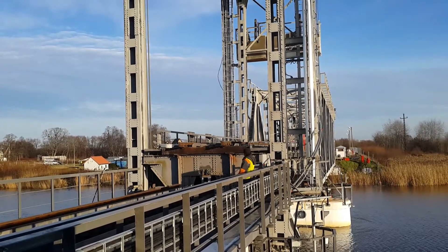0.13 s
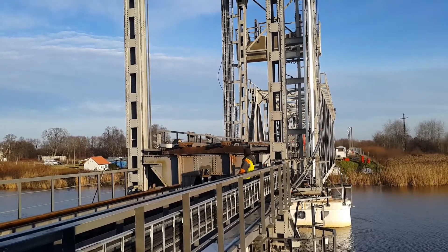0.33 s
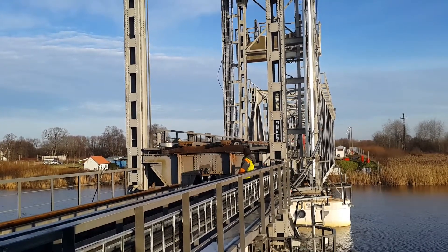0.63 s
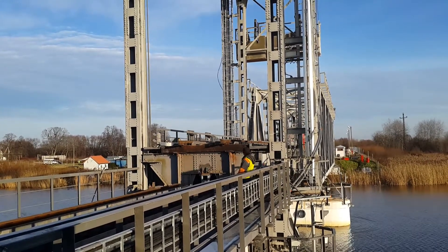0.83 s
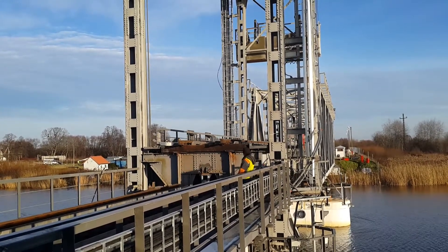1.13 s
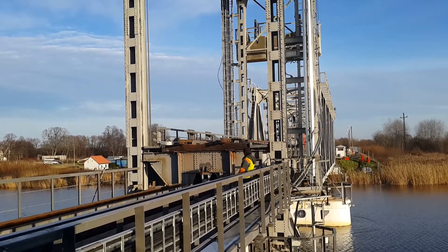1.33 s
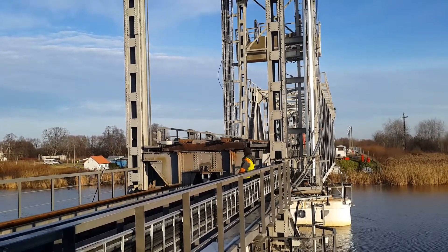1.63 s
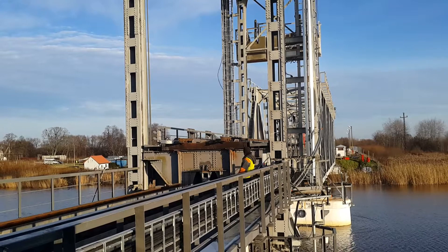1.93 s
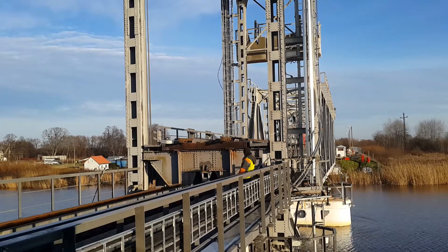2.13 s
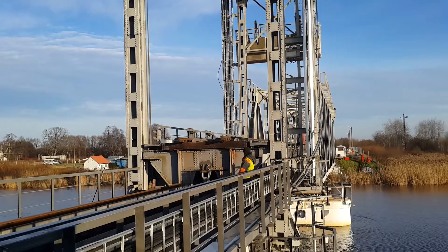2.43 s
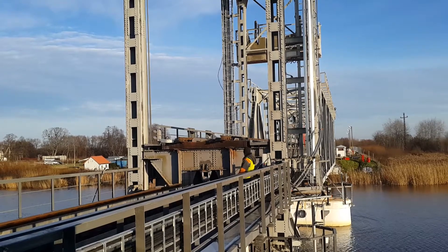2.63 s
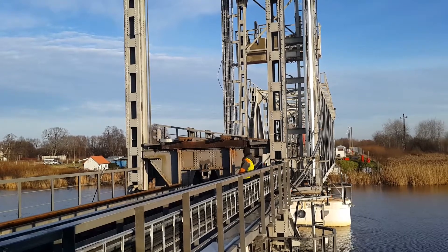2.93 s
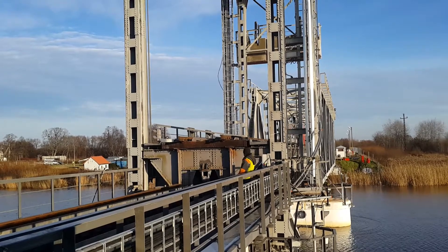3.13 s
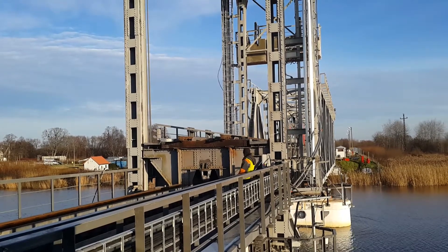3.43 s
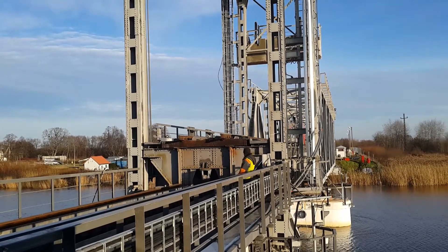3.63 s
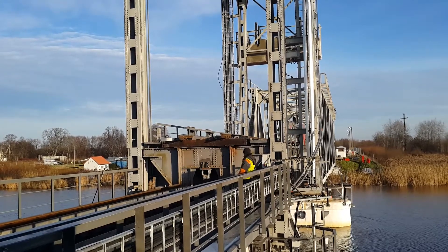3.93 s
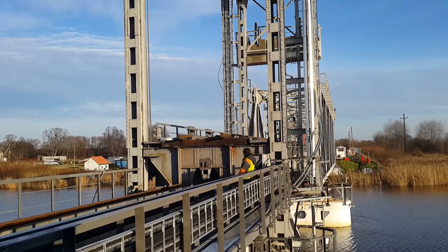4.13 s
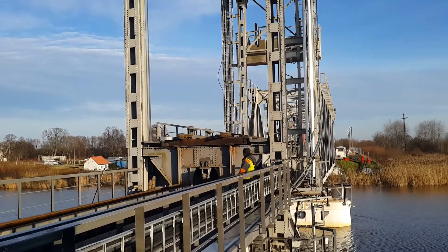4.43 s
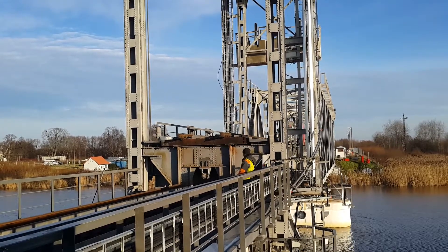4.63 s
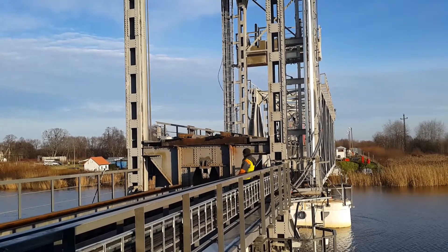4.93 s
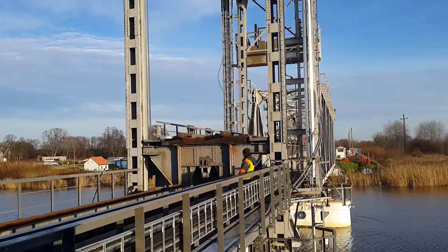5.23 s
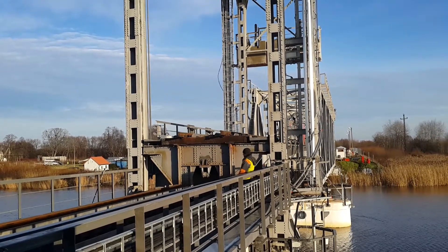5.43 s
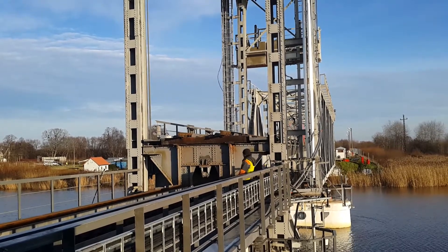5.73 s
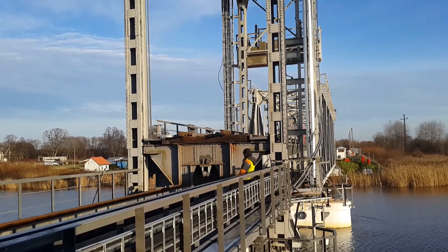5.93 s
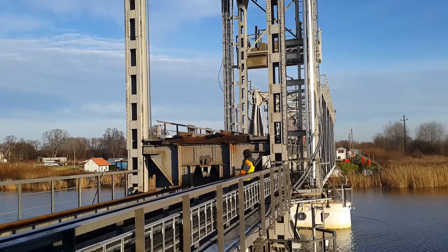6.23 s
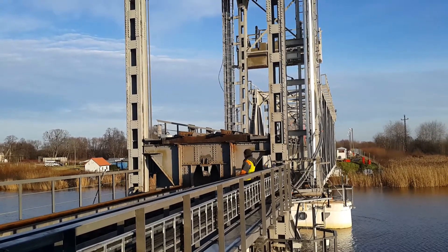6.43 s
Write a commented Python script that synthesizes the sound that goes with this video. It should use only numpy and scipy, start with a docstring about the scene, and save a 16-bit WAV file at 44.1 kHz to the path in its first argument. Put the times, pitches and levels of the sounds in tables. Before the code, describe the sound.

A loud, steady low-mid gear hum throbs quickly from a lift bridge's drive, with thin high electrical whine and rushing cooling air behind it.

```python
"""A throbbing gear hum, loudest at the octave of its mesh rate: the steady drive of a lift bridge over a river,
heard from the approach span. Tooth errors repeat every turn as rumble and drones; panels grind and sing.
The inverter whistles around 4, 8 and 12 kHz as sidebands of its carrier; bearings and motor slots add thin whines.
Behind them, shaped noise makes rushing cooling air, swells of soft hiss and a breeze that dies down early."""
import sys
import numpy as np
from scipy import signal
from scipy.fft import rfft, irfft
from scipy.io import wavfile

SR = 44100
rng = np.random.default_rng(int(sys.argv[2]) if len(sys.argv) > 2 else 0)


def dump(signal):
    """Clip the signal to [-1, 1] and save it as 16-bit WAV at the path in sys.argv[1]."""
    limited = np.clip(np.atleast_2d(signal).T, -1, 1)
    pcm = np.round(limited * 32767).astype(np.int16)
    wavfile.write(sys.argv[1], SR, pcm)


N = 291060
T = np.arange(N) / SR  # s
BINS = np.maximum(np.arange(N // 2 + 1) * SR / N, 1)  # Hz
TOP_HZ = 15200

# In every table, pan is left minus right, and density is noise level per Hz.

# light breeze on the microphones, before the gust: [f/Hz, density/dB, pan/dB]
BREEZE = [(20, -89, 7), (45, -79, 5.5), (70, -77.5, 4), (101, -81.5, -1.5), (150, -92, -4.5),
          (400, -130, 4)]
GUST_DB, GUST_FALL_S = 15, 0.41  # lift at the start, and its decay time
# cooling air and open air: [f/Hz, density/dB, pan/dB]
AIR = [(50, -86, 1), (94, -76, 1.5), (150, -68.5, -1.5), (234, -55.5, -2.5), (400, -58.5, -5.5),
       (606, -61.5, -0.5), (730, -61.5, -17.5), (935, -68.5, -6), (1090, -69, 1.5), (1320, -72.5, -3.5),
       (1650, -70, -2.5), (1790, -75.5, -0.5), (1930, -74.5, 0.5), (2570, -80, 3), (3260, -76.5, 2.5),
       (3830, -79.5, -1), (4680, -86.5, 3.5), (7300, -88.5, 9), (8600, -91.5, 0.5), (12400, -103, -0.5),
       (15500, -102, 0.5)]
# resonances of the machine housing: [f/Hz, half width/Hz, density/dB, pan/dB]
HOUSING = [(5160, 360, -83, 3.5), (6680, 450, -85.5, 13)]
# swells of soft hiss: [t/s, rise/s, fall/s, level on top of the colour/dB, brightness/dB per octave]
SWISHES = [(.93, 0.094, 0.089, -9, -3.5), (1.85, 0.1, 0.1, -11, 10), (2.35, 0.09, 0.1, -8.5, 8),
           (2.72, .07, 0.09, -13, 10), (3.27, 0.06, 0.07, -8, 7), (3.42, 0.06, 0.07, -11, 11),
           (3.68, 0.13, 0.36, -7.5, 6), (4.5, 0.045, 0.1, -9.5, 12), (6.21, 0.12, 0.17, -7, -1.5),
           (6.53, 0.12, 0.13, -7.5, -2)]
# colour shared by the swells: [f/Hz, density/dB, pan/dB]
SWISH_COLOUR = [(1500, -100, -11.5), (3280, -71.5, 7.5), (5300, -75, 7.5), (7000, -78.5, 15.5),
                (9000, -84.5, -2.5), (10400, -86.5, -1), (12000, -104, 1), (15500, -111, -7)]

CARRIER_HZ, SUPPLY_HZ = 4000, 47.15
# weak clusters round carrier multiples 1, 2, 3: [line level/dB, half width/Hz, pan/dB, fizz density/dB]
SIDEBANDS = [(-73, 200, 2, -82), (-70, 280, 2.5, -90.5), (-82.5, 240, 2.5, -94)]
SIDEBAND_FOLLOW = .45  # share of the whistle pair's swell, in dB, that the clusters follow
# whistle three supply steps below the carrier: [t/s, level/dB, pan/dB]
WHISTLE_LOW = [(0.02, -53, 7.5), (0.93, -56, -8), (1.34, -66, -1), (1.61, -54, 4.5), (2.02, -63.5, -5),
               (2.18, -64, 0), (2.78, -58, -1), (2.97, -65, -4), (3.09, -64, -4), (3.37, -52.5, 14),
               (3.51, -57, 10), (4.05, -48, 13), (4.21, -53, 14), (4.62, -45, 4), (5.31, -49, 16),
               (6.08, -46, 12), (6.36, -57, 4), (6.58, -56, 13)]
# whistle three supply steps above the carrier: [t/s, level/dB, pan/dB]
WHISTLE_HIGH = [(0.02, -51, 11), (0.5, -44.5, 16.5), (0.75, -48, 6), (1.05, -51, 2), (1.19, -50, 10),
                (1.45, -54.5, 3), (1.71, -52, 6), (2.0, -63.5, -3), (2.12, -62, 1.5), (2.23, -64, 1),
                (2.35, -59.5, 12), (3.11, -60, 21), (3.24, -49, 14), (3.43, -45.5, 14), (3.56, -57.5, 1),
                (3.99, -53.5, 4), (4.32, -43, 7), (4.49, -46, 12), (4.85, -46, 6), (5.18, -53.5, -5),
                (5.64, -50.5, 12), (5.78, -59, 7), (6.08, -52, 16), (6.58, -48.5, 9)]
# thin pair of whistles either side of twice the carrier: [t/s, level/dB]
WHISTLE_PAIR = [(0.02, -58.5), (0.33, -60.5), (1.57, -62), (1.9, -65), (2.23, -68), (3.39, -63.5),
                (4.05, -65.5), (4.37, -62), (4.81, -66.5), (5.03, -65), (5.87, -60.5), (6.58, -61)]
# other inverter tones: [carrier multiple, supply multiple, level/dB, pan/dB]
SWITCHING = [(1, -5, -64, -1), (1, -1, -61.5, 4), (1, 0, -60, 4), (1, 1, -63.5, -1), (1, 2, -61, 3),
             (1, 5, -66.5, -3), (1, 6, -67, 4), (1, 9, -63.5, 13), (2, -6, -70, 10), (2, 6, -70.5, 6),
             (3, -2, -76, -2), (3, 2, -78, -1)]

# bearing whines: [f/Hz, level/dB, pan/dB]
BEARINGS = [(842, -55, -5), (1114, -49.5, -2), (1131, -55, 8), (1183, -48.5, -2), (2172, -56, 8),
            (2273, -58, -8), (2360, -63.5, 6)]
# motor slot tones: [f/Hz, level/dB, pan/dB]
SLOTS = [(2697, -63, 1), (2771, -66, 5), (2896, -65, 6), (3257, -67, 5), (3350, -61, 7), (3391, -67, 5),
         (3490, -52.5, 8), (3560, -67, 8), (3632, -52, -5), (4315, -66, 10), (4369, -66, 3),
         (4510, -64.5, 7), (4650, -66, 4)]

# panels that the gear sets grinding, before the lift: [f/Hz, half width/Hz, density/dB, pan/dB]
PANELS = [(994, 23, -67, -0.5), (1021, 14, -65, 3.5), (1208, 46, -66.5, -5.5), (1390, 38, -67, 1),
          (1524, 54, -68, -10.5), (1641, 55, -66, -12), (1736, 20, -66, -16)]
# lift of the grinding, which eases off and then grows late on: [t/s, lift/dB]
GRIND_LIFT = [(0, 1.5), (4.9, 1), (5.4, 0), (6.6, 2)]
SURGE_DB, SURGE_RATE = 0.94, 9  # random surges of the grinding: spread, changes a second
# the one panel that sings in rough surges: [t/s, level/dB]
PANEL_SONG = [(0.02, -59), (0.14, -49), (0.56, -45), (0.74, -58), (0.89, -43), (1.06, -53), (1.54, -58),
              (1.65, -40), (1.93, -61), (2.0, -44), (2.15, -55), (2.3, -41.5), (2.66, -54), (2.74, -41),
              (2.98, -51), (3.58, -49), (3.95, -46.5), (4.41, -48), (4.49, -50), (4.84, -62), (5.2, -47),
              (5.3, -41), (5.4, -38.5), (5.56, -51), (5.84, -40), (5.91, -46), (5.99, -44), (6.1, -39),
              (6.18, -57), (6.3, -43), (6.45, -41.5), (6.56, -51)]
PANEL_HZ = 1552

TEETH, MATE_TEETH, MESH_HZ = 30, 40, 173.07
# steelwork under the gear: [f/Hz, density/dB]
STEELWORK = [(60, -95.5), (100, -68.5), (130, -61), (160, -64), (200, -60), (250, -59.5), (290, -56),
             (320, -44.5), (350, -48.5), (400, -60), (530, -57), (700, -63.5), (1200, -95), (2500, -100)]
# girder resonances on top of the steelwork: [f/Hz, half width/Hz, lift/dB]
GIRDERS = [(131, 2, 6), (223, 3, 7), (320, 4, 4), (540, 10, 4)]
# low drones of the wheel's tooth errors: [cycles a turn, level/dB]
DRONES = [(14, -63), (18, -58), (20, -52.5), (22, -48), (24, -48.5), (26, -49.5), (28, -50), (34, -42.5),
          (36, -47.5), (38, -48.5), (40, -48), (48, -43), (50, -47)]
DRONE_WAVER_DB, DRONE_RATE = 1.5, 2.5  # spread, changes a second

# hum's lowest tone, at the mesh rate itself: [t/s, level/dB]
HUM_BASE = [(0, -39), (.5, -44), (1.3, -34), (2.9, -58), (4.2, -36.5), (5.6, -48), (6.6, -31.5)]
# hum's loud octave, which swells, sinks and beats: [t/s, level/dB, pan/dB]
HUM_OCTAVE = [(0.02, -14, -3), (0.5, -14.5, -3.5), (0.79, -15.5, -3), (0.93, -14.0, -3.5),
              (1.37, -15, -3.5), (1.79, -14, -2.5), (2.22, -15.5, -4), (2.43, -20, -6), (2.56, -17.5, -5),
              (2.76, -19, -6), (2.8, -14.5, -3), (3.33, -15.0, -2.5), (3.47, -17, -5), (3.52, -13, -3),
              (3.57, -17.5, -3), (3.7, -20, -6), (3.73, -24, -10), (3.77, -20, -8), (3.82, -29, -15),
              (3.89, -24, -15), (4.04, -23.5, -10), (4.08, -28, -16), (4.12, -19, -5), (4.17, -29, -12),
              (4.2, -19.5, -7), (4.27, -25.5, -11), (4.31, -23, -7), (4.35, -27, -6), (4.39, -17.5, -5),
              (4.43, -21, -6), (4.46, -18, -4), (4.52, -21.5, -6), (4.55, -17, -5), (4.68, -22, -7),
              (4.74, -18.5, -6), (4.78, -26, -11), (4.81, -16, -3), (4.87, -25, -6), (4.94, -22.5, -11),
              (4.97, -18, -5), (5.01, -20.5, -6), (5.16, -17, -4), (5.22, -20, -6), (5.32, -14.5, -3),
              (5.35, -17.5, -4), (5.51, -19.5, -3.5), (5.56, -26.0, -6), (5.62, -15, -3), (5.87, -16, -3),
              (5.93, -20.5, -4), (5.97, -14, -2), (6.07, -22.5, -6), (6.17, -19.5, -4), (6.23, -21.5, -9),
              (6.26, -35, -9), (6.45, -18.5, 3), (6.52, -21.5, -1), (6.58, -16.5, -1)]
# hum's twelfth, at three times the mesh rate: [t/s, level/dB]
HUM_TWELFTH = [(0.02, -30), (0.16, -27.5), (0.32, -32), (0.46, -30), (0.69, -28.0), (0.77, -38.5),
               (1.04, -28.5), (1.36, -31.5), (1.41, -37), (1.44, -28), (1.64, -22.5), (1.99, -31),
               (2.04, -26), (2.34, -28.5), (2.39, -25.0), (2.66, -32), (2.81, -28.5), (2.9, -33),
               (2.99, -32.5), (3.13, -34), (3.18, -45), (3.21, -31), (3.33, -30), (3.47, -33),
               (3.53, -46.5), (3.71, -28), (3.82, -32.5), (3.98, -28), (4.13, -36.5), (4.18, -26.5),
               (4.25, -32.5), (4.57, -28), (4.66, -36.5), (4.71, -27.5), (4.77, -43), (4.83, -28),
               (4.97, -35.5), (5.01, -27.5), (5.26, -29), (5.42, -34), (5.46, -29.5), (5.79, -26.5),
               (5.84, -40), (5.88, -28), (6.17, -34), (6.32, -28.5), (6.47, -45), (6.58, -29)]
# hum's double octave, at four times the mesh rate: [t/s, level/dB]
HUM_DOUBLE = [(0.02, -42), (0.27, -48), (0.38, -55.5), (0.63, -42.5), (0.77, -42.5), (1.01, -44),
              (1.34, -35.5), (1.56, -45), (1.77, -56.5), (2.04, -29), (2.24, -43), (2.38, -36.5),
              (2.62, -50), (2.75, -33), (2.82, -50), (3.07, -38), (3.19, -43.5), (3.79, -34.5), (3.93, -51),
              (4.4, -44.5), (5.08, -44.5), (5.48, -40), (5.65, -40), (6.58, -35)]
# weaker mesh overtones: [multiple of the mesh rate, level/dB, pan/dB]
OVERTONES = [(5, -45.5, -7), (6, -51, 1), (7, -46.5, 0), (8, -56, -2), (10, -53.5, -10)]
# a faint, rough, randomly fluttering layer at the octave's pitch, well below it
FLUTTER_DB, FLUTTER_RATE = -42.5, 20  # level before the throb, changes a second
THROB_DEPTH, THROB_UNEVEN = 0.5, 0.35  # shares
THROB_AT_S, THROB_DEEPENS = .0104, .2  # first drop of load; dB deeper for each dB the octave sinks


def undb(db):
    """Decibels to gain."""
    return 10 ** (np.asarray(db) / 20)


def ears(pan_db):
    """Pans with a column of left and right gains whose total power stays equal."""
    gains = undb(np.array([[.5], [-.5]]) * pan_db)
    return gains / np.sqrt(np.mean(gains ** 2, axis=0))


def curves(table):
    """Draws automation from a time table: each column as one value a sample."""
    s, *columns = np.transpose(table)
    return [np.interp(T, s, c) for c in columns]


def spectra(table):
    """Draws EQ curves from a frequency table, straight on a log axis: one value a bin."""
    hz, *columns = np.transpose(table)
    return [np.interp(np.log(BINS), np.log(hz), c) for c in columns]


def walk(rate):
    """Smooth random modulation of spread about 1 that changes about rate times a second."""
    points = signal.resample_poly(rng.standard_normal(400), 8, 1)
    return np.interp(T * rate * 8, np.arange(len(points)), points)


def colour(white, gain):
    """Shapes white sound of rms 1 to a gain per root Hz."""
    return irfft(rfft(white) * gain * np.sqrt(SR / 2), N)


def stereo_noise(alike_hz):
    """White noise that is much the same in both ears below alike_hz and widens above it."""
    mid, side = rfft(rng.standard_normal((2, N)))
    alike = np.clip(0.18 + 0.69 / (1 + (BINS / alike_hz) ** 2), 0, 1)
    shared = mid * np.sqrt((1 + alike) / 2)
    opposed = np.array([[1], [-1]]) * side * np.sqrt((1 - alike) / 2)
    return irfft(shared + opposed, N)


def resonances(modes, flicker_db):
    """Noise ringing in a few broad modes, each flickering on its own."""
    out = 0
    for hz, width_hz, db, pan_db in modes:
        peak = undb(db) / (1 + ((BINS - hz) / width_hz) ** 2)
        ringing = colour(stereo_noise(alike_hz=1600), peak * ears(pan_db))
        out = out + ringing * undb(flicker_db * walk(6))
    return out


def tone(turns, db, pan_db, scatter, rate, apart):
    """A line heard directly and by shifting paths off the steel, so it fades a little differently in each ear."""
    angle = 2 * np.pi * ((turns + rng.random()) % 1)
    cos, sin = np.cos(angle), np.sin(angle)
    shared, left, right = (walk(rate) * cos + walk(rate) * sin for _ in range(3))
    paths = cos + scatter * shared + scatter * apart * np.array([left, right])
    # keep the rms at db however strong the scattered paths are
    level = np.sqrt(2 / (1 + 2 * scatter ** 2 * (1 + apart ** 2))) * undb(db)
    return level * ears(pan_db) * paths


def thin_lines(rows, apart_turns):
    """Pure, steady tones from rows of f/Hz, level/dB, pan/dB; the ears' phases differ by up to apart_turns."""
    hz, db, pan_db = np.transpose(rows)
    shared, own = rng.random((len(hz), 2)).T
    turns = shared + np.array([[1], [-1]]) * apart_turns * (own - .5)
    places = np.round(hz * N / SR).astype(int)
    spectrum = np.zeros((2, len(BINS)), complex)
    spectrum[:, places] = undb(db) * ears(pan_db) * np.exp(2j * np.pi * turns)
    return irfft(spectrum, N) * N / np.sqrt(2)


def late_left(sound, lag_s):
    """Delays the left ear by lag_s, to whole samples, or advances it if that is negative."""
    samples = np.arange(N)
    return np.array([np.interp(samples - np.round(lag_s * SR), samples, sound[0]), sound[1]])


def breeze():
    """A faint, gusting low flutter that differs between the two microphones."""
    db, pan_db = spectra(BREEZE)
    gust_db = GUST_DB * np.exp(-T / GUST_FALL_S) + 2.0 * walk(6.5)
    return colour(stereo_noise(alike_hz=90), undb(db) * ears(pan_db)) * undb(gust_db)


def air():
    """Cooling air rushes through the machine house and rings its walls."""
    db, pan_db = spectra(AIR)
    rush = colour(stereo_noise(alike_hz=1260), undb(db) * ears(pan_db)) * undb(.5 * walk(18))
    return rush + resonances(HOUSING, flicker_db=1.5)


def swishes():
    """Soft, slightly grainy hiss swells and dies away, each time with its own brightness."""
    colour_db, pan_db = spectra(SWISH_COLOUR)
    hiss = stereo_noise(alike_hz=1500)
    octaves = np.log2(np.maximum(BINS, 3000) / 6500)  # the tilt pivots at 6500 Hz
    out = 0
    for s, rise, fall, db, tilt_db in SWISHES:
        swell = np.exp(-np.abs((T - s) / np.where(T < s, rise, fall)) ** 1.4)
        gain = undb(db + colour_db + tilt_db * octaves) * ears(pan_db)
        out = out + swell * colour(hiss, gain)
    grain_db = 1.2 * walk(50) + 1.2 * walk(16)
    return out * undb(grain_db)


def sidebands():
    """Switching sets a flat-topped cluster of weak lines and a little fizz round each carrier multiple."""
    comb, fizz = np.zeros((2, len(BINS)), complex), 0
    steps = np.arange(-12, 13)
    whistle_steps = (3, 2, 2)  # left empty round each multiple, for stronger tones
    for m, (db, width_hz, pan_db, fizz_db) in enumerate(SIDEBANDS, 1):
        distance = (BINS - m * CARRIER_HZ) / width_hz
        cluster = ears(pan_db) * np.exp(-.5 * distance ** 4)
        offsets = SUPPLY_HZ * steps[np.abs(steps) != whistle_steps[m - 1]]
        places = np.round((m * CARRIER_HZ + offsets) * N / SR).astype(int)
        sizes = undb(db + 1.3 * rng.standard_normal((2, len(offsets)))) * cluster[:, places]
        comb[:, places] = sizes * np.exp(2j * np.pi * rng.random(sizes.shape))
        fizz = fizz + undb(fizz_db) * cluster
    pair_db, = curves(WHISTLE_PAIR)
    swell_db = SIDEBAND_FOLLOW * (pair_db - pair_db.mean()) + .8 * walk(3.5)
    lines = irfft(comb, N) * N / np.sqrt(2) * undb(swell_db)
    return lines + colour(rng.standard_normal((2, N)), fizz)


def inverter():
    """Switching makes the motor's iron sing round the carrier's multiples, spaced by the supply rate."""
    out = 0
    for k, whistle in ((-3, WHISTLE_LOW), (3, WHISTLE_HIGH)):
        db, pan_db = curves(whistle)
        out = out + tone((CARRIER_HZ + k * SUPPLY_HZ) * T, db, pan_db, scatter=.06, rate=10, apart=1.5)
    pair_db, = curves(WHISTLE_PAIR)
    for k in (-2, 2):
        out = out + tone((2 * CARRIER_HZ + k * SUPPLY_HZ) * T, pair_db, 9.9, scatter=0.091, rate=5, apart=1.4)
    rows = [(m * CARRIER_HZ + k * SUPPLY_HZ, db, pan_db) for m, k, db, pan_db in SWITCHING]
    return out + thin_lines(rows, apart_turns=0.77) * undb(0.91 * walk(2.2))


def whines():
    """Bearings sing thin, wavering lines; the motor's slot tones above them hold steadier."""
    bearings = sum(tone(hz * T, db, pan_db, scatter=.4, rate=7, apart=0.72) for hz, db, pan_db in BEARINGS)
    slots = thin_lines(SLOTS, apart_turns=.2) * undb(1.0 * walk(4))
    return bearings + slots


def grind():
    """Sliding teeth make the panels grind in small random surges; one panel swells into a rough song."""
    lift_db, = curves(GRIND_LIFT)
    song_db, = curves(PANEL_SONG)
    song = tone(PANEL_HZ * T, song_db, -9.5, scatter=.95, rate=48, apart=.6)
    surge_db = SURGE_DB * walk(SURGE_RATE)
    return song + resonances(PANELS, flicker_db=1.0) * undb(lift_db + surge_db)


def each_turn(turns, top_hz, odd_db):
    """A random pattern round the wheel, rms 1; an oval wheel makes its two halves much alike."""
    orders = np.arange(int(top_hz * T[-1] / turns[-1]))  # cycles a turn
    sizes_db = 2.5 * rng.standard_normal(4096)[orders] + odd_db * (orders % 2)
    sizes = undb(sizes_db) * (orders > 0)
    pattern = irfft(sizes * np.exp(2j * np.pi * rng.random(4096)[orders]), 32768)
    return np.interp(turns % 1, np.linspace(0, 1, len(pattern)), pattern / pattern.std())


def rumble(mesh):
    """Each wheel's tooth errors shake the steelwork alike on every turn: two interleaved combs of low lines."""
    top_hz = 2500
    wheel = each_turn(mesh / TEETH, top_hz, odd_db=-7.5)
    mate = each_turn(mesh / MATE_TEETH, top_hz, odd_db=-3.0)
    steel_db, = spectra(STEELWORK)
    steel_db = steel_db + sum(db / (1 + ((BINS - hz) / width_hz) ** 2) for hz, width_hz, db in GIRDERS)
    shake = (wheel + mate) * np.sqrt(top_hz / SR) * undb(1.0 * walk(6.5))
    pan_db = np.interp(BINS, [120, 450], [-.5, -4.5])
    return colour(shake, undb(steel_db) * ears(pan_db))


def drones(mesh):
    """The oval wheel's strongest tooth errors sound as clean, slowly wavering low lines."""
    out = 0
    for order, db in DRONES:
        level = undb(db + DRONE_WAVER_DB * walk(DRONE_RATE))
        out = out + level * np.cos(2 * np.pi * (order * mesh / TEETH + rng.random()))
    return np.sqrt(2) * out * ears(-1.5)


def gear(mesh):
    """Teeth hum at the mesh rate; twice a turn the load drops, the wheel skips ahead and the teeth bite again."""
    base_db, = curves(HUM_BASE)
    octave_db, octave_pan_db = curves(HUM_OCTAVE)
    twelfth_db, = curves(HUM_TWELFTH)
    double_db, = curves(HUM_DOUBLE)

    half_turn = (2 * (mesh - THROB_AT_S * MESH_HZ) / TEETH) % 1
    bite = (1 - np.exp(-(half_turn / .3) ** 2)) * (1 - half_turn)
    throb = THROB_DEPTH * (bite - bite.mean()) * (1 + THROB_UNEVEN * walk(11.0))
    skip = .035 * (1 - np.exp(-half_turn / .15)) * (1 - half_turn)  # in mesh cycles
    turns = mesh + skip

    octave = tone(2 * turns, octave_db, octave_pan_db, scatter=0.025, rate=45, apart=2.7)
    flutter = tone(2 * turns, FLUTTER_DB, -7.5, scatter=5.7, rate=FLUTTER_RATE, apart=0.56)
    others = tone(turns, base_db, -0.92, scatter=0.12, rate=4.2, apart=0.18)
    others = others + tone(3 * turns, twelfth_db, -6.0, scatter=0.057, rate=12, apart=0.62)
    others = others + tone(4 * turns, double_db, -8.5, scatter=0.17, rate=12, apart=0.97)
    for k, db, pan_db in OVERTONES:
        others = others + tone(k * mesh, db, pan_db, scatter=0.55, rate=7, apart=0.56)

    # the octave throbs harder where it is low
    deeper = undb(THROB_DEEPENS * (octave_db.max() - octave_db))
    return octave * (1 + deeper * throb) + (flutter + others) * (1 + throb)


def scene():
    """The drive holds its speed closely; its hum comes from a little to the right, the hiss from the left."""
    mesh_hz = MESH_HZ + 0.1353 * walk(1.999)
    mesh = np.cumsum(mesh_hz) / SR  # teeth met so far
    hiss = late_left(air() + swishes(), lag_s=-.00005)
    hum = late_left(rumble(mesh) + drones(mesh) + gear(mesh), lag_s=0.00021)
    return breeze() + hiss + sidebands() + inverter() + whines() + grind() + hum


def record(dry):
    """Eases the sound in and out over 4 ms, and cuts the top steeply above TOP_HZ."""
    eased = dry * np.minimum(np.minimum(T, T[-1] - T) / .004, 1)
    top_cut = signal.ellip(10, .2, 80, TOP_HZ, fs=SR, output="sos")
    return signal.sosfilt(top_cut, eased)


dry = scene()
out = record(dry)
dump(out)
```